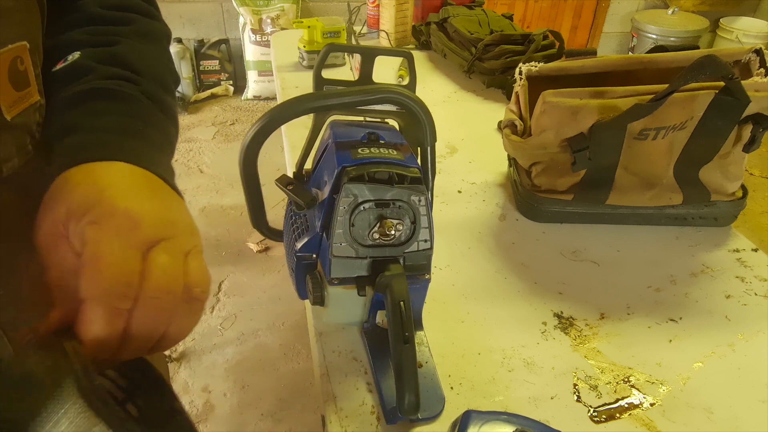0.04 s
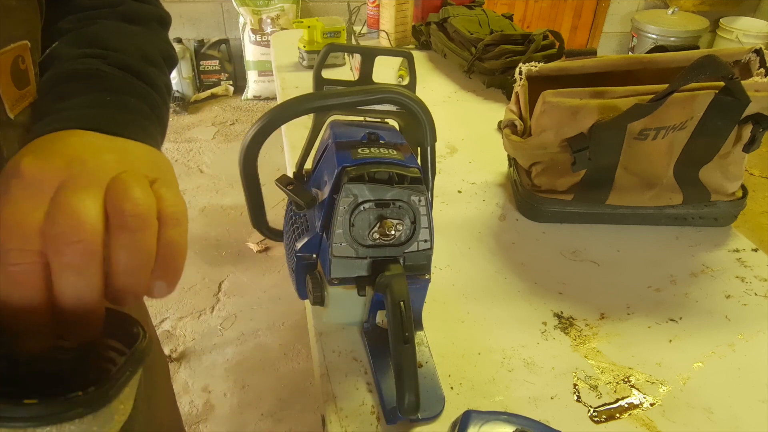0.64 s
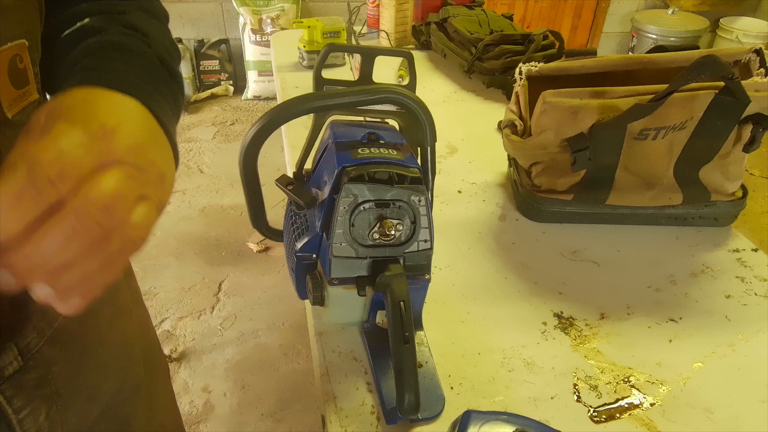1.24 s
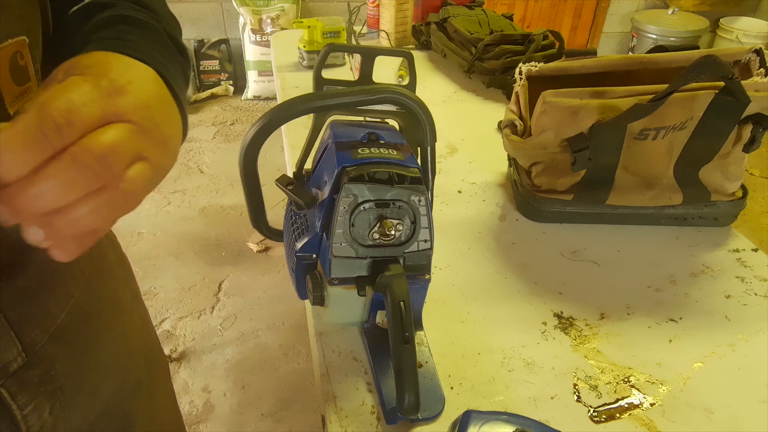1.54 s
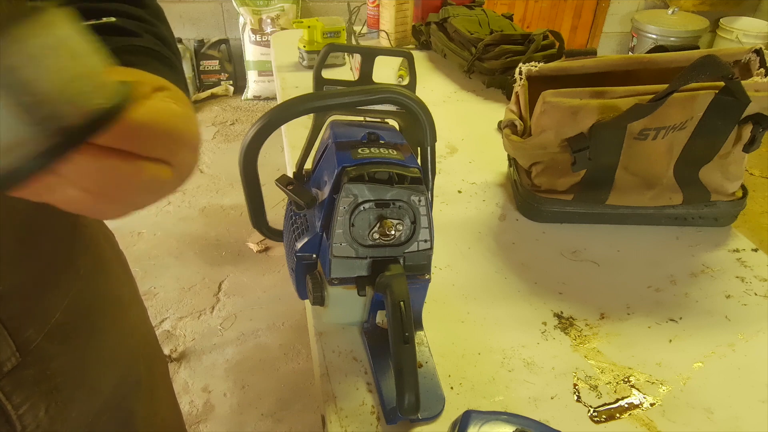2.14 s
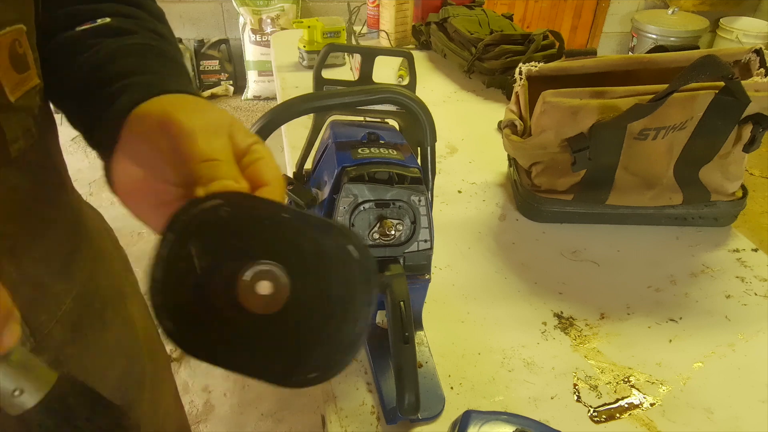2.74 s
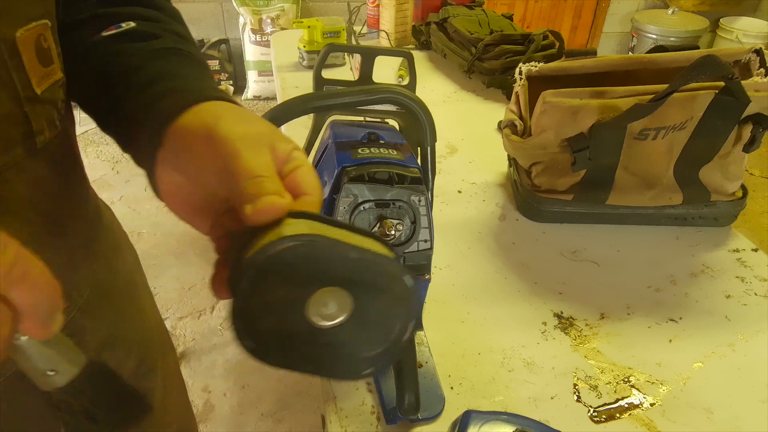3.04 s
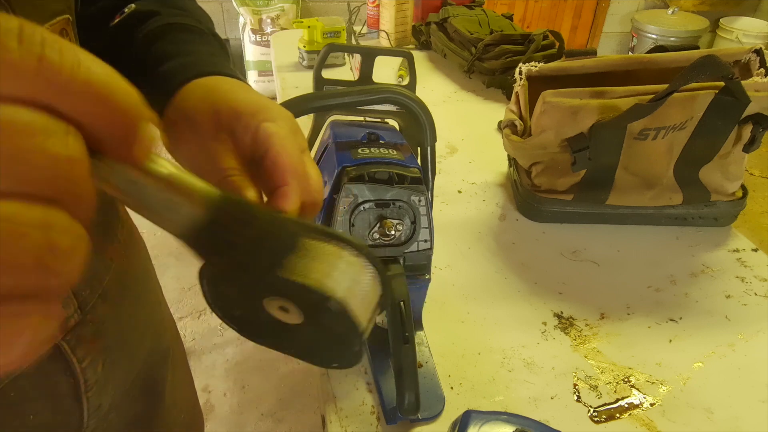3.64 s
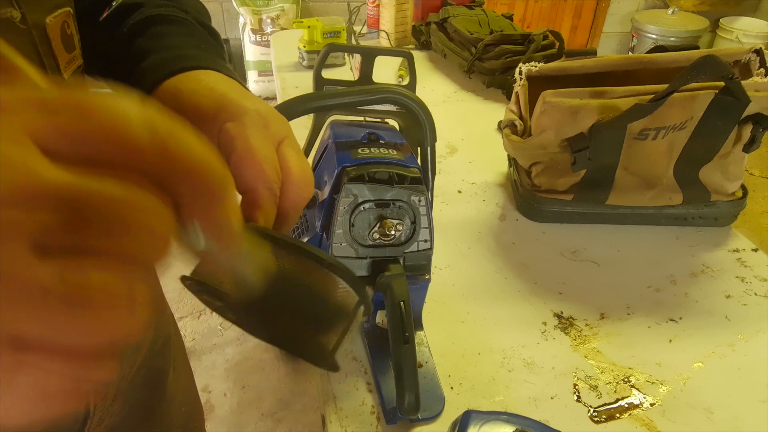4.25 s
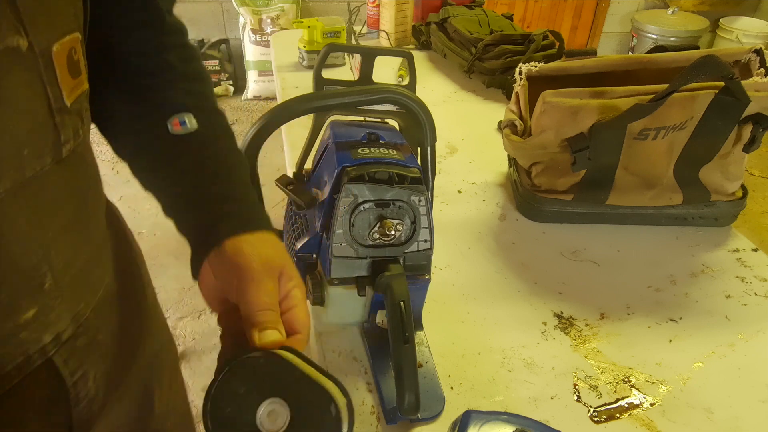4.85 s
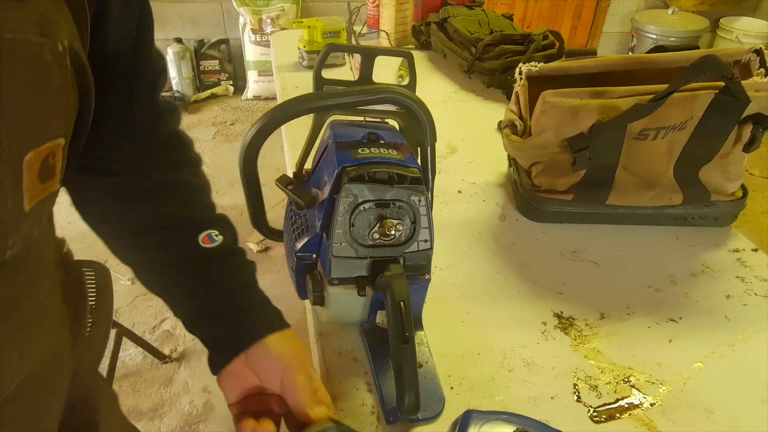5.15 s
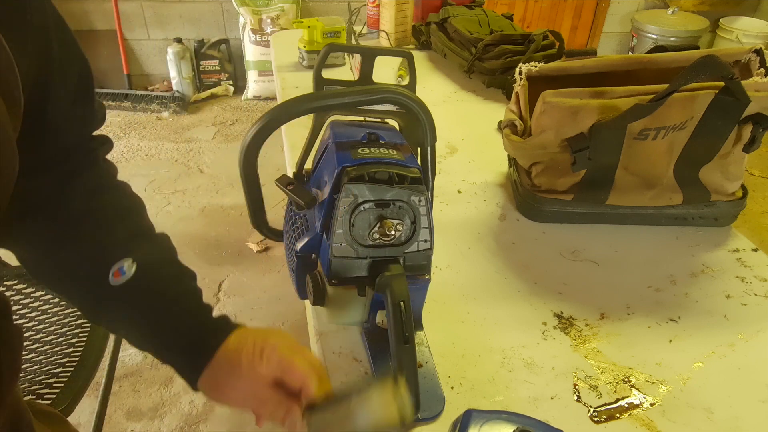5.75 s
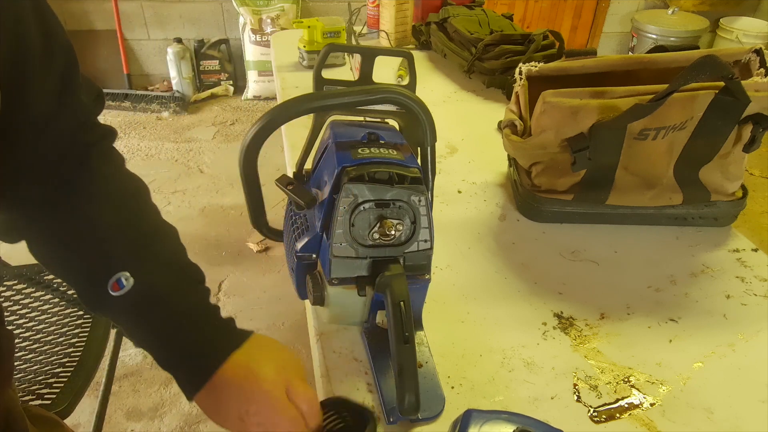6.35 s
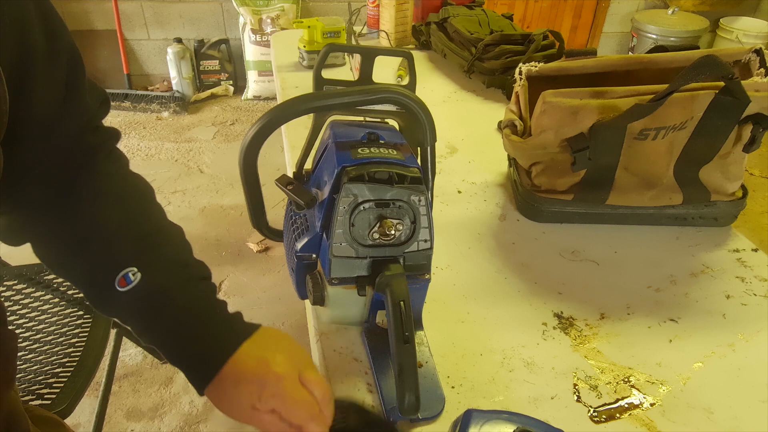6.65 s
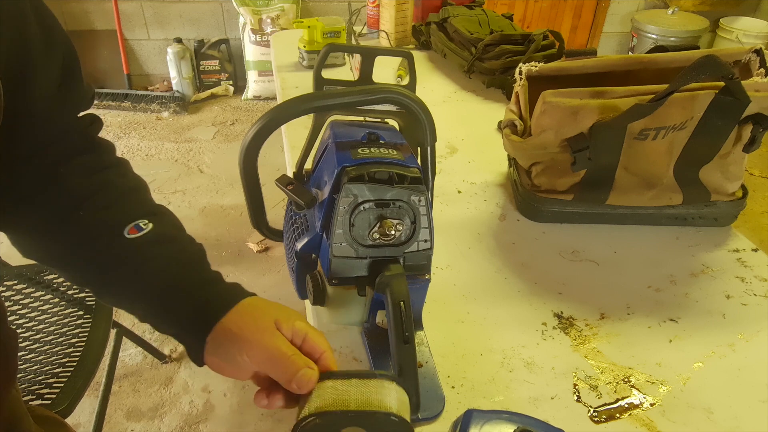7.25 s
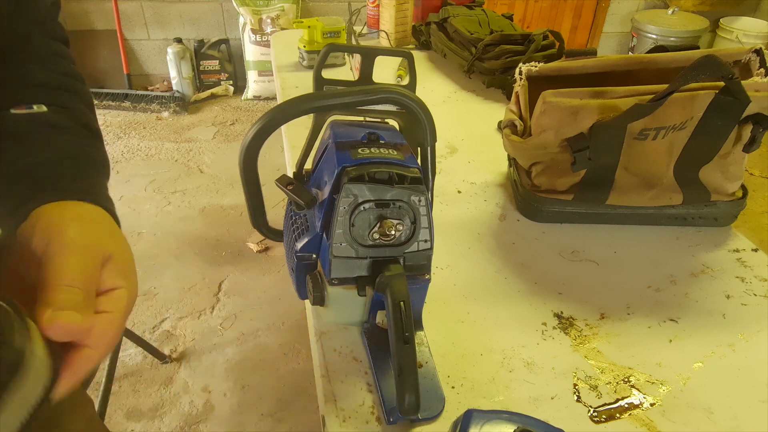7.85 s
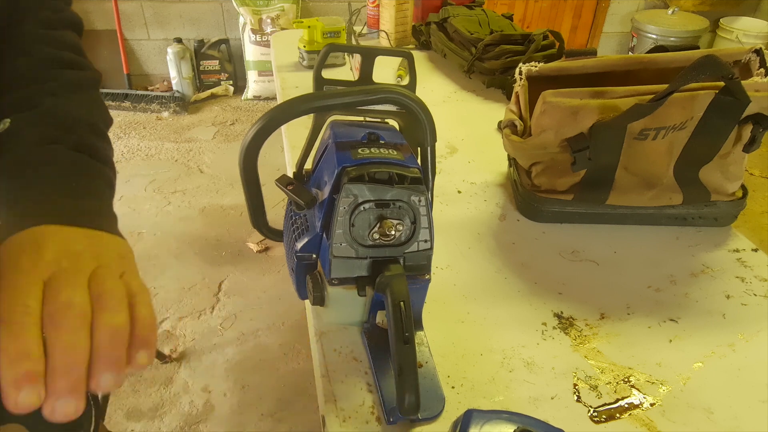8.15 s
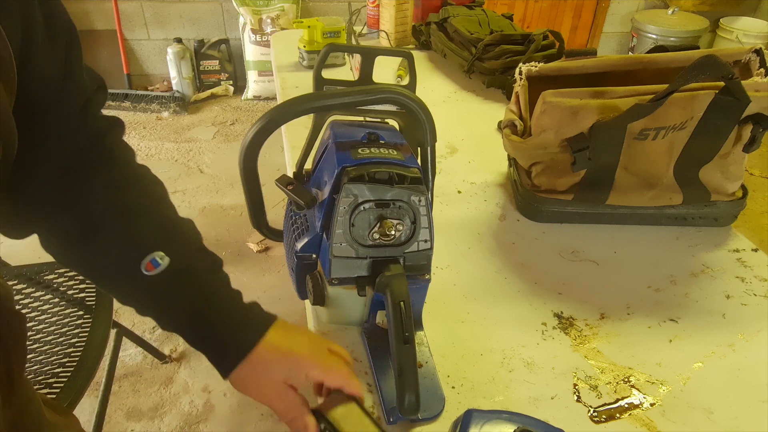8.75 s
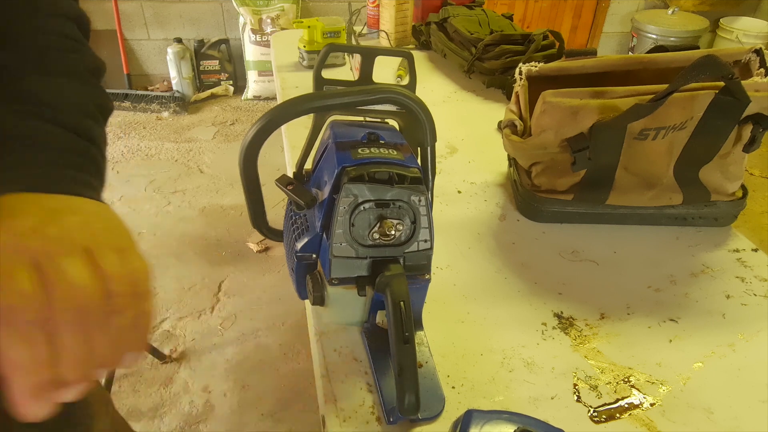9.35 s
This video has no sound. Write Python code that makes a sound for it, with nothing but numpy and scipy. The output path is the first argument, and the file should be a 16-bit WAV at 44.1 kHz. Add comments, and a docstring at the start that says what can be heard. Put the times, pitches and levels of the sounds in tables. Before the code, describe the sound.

In a workshop, a brush flicks softly over the pleats of a plastic air filter, close to the microphone, about three or four short hissing strokes a second, with a few small clicks. The filter is then knocked on a bench edge ten times in a quick run, each a loud hollow clack with a low thud. After a pause come two more knocks. A faint motor hum continues underneath.

```python
"""A chainsaw air filter is cleaned in a workshop, over the faint hum of a motor and still air.
First a brush flicks over the pleats, hissing by friction, and the frame snaps under the fingers.
From 5 s the filter is knocked ten times on the bench edge: each impact excites the modes of the plastic
frame and the bench top, the room reverberates, and a gain control briefly lowers the level.
A flick and a snap follow, then two more knocks near 8.7 s and a last faint flick."""
import sys
import numpy as np
from scipy import signal
from scipy.fft import rfft, irfft
from scipy.io import wavfile
from scipy.ndimage import minimum_filter1d

SR = 44100
rng = np.random.default_rng(int(sys.argv[2]) if len(sys.argv) > 2 else 0)


def inscribe(sig):
    """Save sig as 16-bit PCM at rate SR to the path in sys.argv[1].

    A 1-D sig is mono; a 2-D sig holds one channel per row.
    Samples are clipped to [-1, 1] before scaling.
    """
    pcm = np.round(np.clip(np.atleast_2d(sig).T, -1, 1) * 32767)
    wavfile.write(sys.argv[1], SR, pcm.astype(np.int16))


N = 414540
TIME = np.arange(N) / SR
TAIL = TIME[:int(.7 * SR)]   # time axis of one decay

# motor hum: (harmonic number, level [dB])
HUM_HARMONICS = [(1, -4), (2, -4.5), (3, -2), (4, -0.5), (5, 2.5), (6, -4.5), (7, -8.5), (8, -8.5), (9, -8),
                 (10, -32), (11, -6.5), (12, -8)]
# still air and microphone hiss: (frequency [Hz], spectral density [dB])
AIR_SPECTRUM = [(25, -3.5), (60, 4), (130, -2.5), (300, -1.5), (600, -3), (1000, -3), (2000, -5.5),
                (3400, -5.5), (4800, -11), (6100, -11.5), (7400, -27.5), (10000, -29.5), (16000, -31.5)]
# brush strokes: (mid time [s], level [dB], half length [s], first touch [share of the sweep])
BRUSH_FLICKS = [(0.04, -61.5, .014, 0), (0.204, -57, 0.021, 0.12), (0.369, -55.5, 0.018, 0.18),
                (1.266, -53, 0.012, .5), (1.546, -56.5, 0.013, 1.14), (1.833, -52.5, 0.016, 0.45),
                (2.11, -50, 0.014, 0), (2.384, -50.5, .019, 0.2), (2.66, -58, .03, 0),
                (2.97, -51.5, .012, 0.41), (3.254, -54, .014, 0.55), (3.511, -52, 0.013, 0.48),
                (3.742, -52, 0.019, 0.29), (3.946, -53.5, .016, .4), (4.14, -54.5, 0.022, 0),
                (4.366, -62.5, 0.051, 1.7), (7.533, -63, .028, 0), (9.373, -65, 0.021, 0)]
# bristle friction: (frequency [Hz], spectral density [dB])
BRISTLE_SPECTRUM = [(500, -18), (1500, -13), (3000, -6), (4300, -12), (5500, 1.5), (6400, 0), (7500, -11),
                    (8800, -22), (9600, -13.5), (12000, -23), (16000, -38)]
# workshop reverberation: (frequency [Hz], level [dB])
ROOM_SPECTRUM = [(50, 8.5), (100, 13), (200, 1), (400, -2.5), (800, 1), (1500, -4), (3200, -1),
                 (6000, -6.5), (12000, -1)]
# its decay: (frequency [Hz], T60 [s])
ROOM_DECAY = [(60, 1), (200, 0.37), (500, 0.5), (1100, 0.41), (3200, 0.38), (6000, 0.27), (12000, 0.23)]
# snaps of the frame: (time [s], level [dB], extra level of the lower modes [dB])
FINGER_SNAPS = [(.4020, -18, -20), (1.2205, -39, -14), (1.255, -34, 0.5), (1.2597, -38, -3),
                (1.5588, -45.5, 6), (4.117, -34, -9), (4.310, -43, -10), (7.7657, -36.5, -2)]
# small ringing edges of the frame: (frequency [Hz], level [dB], T60 [s])
EDGE_MODES = [(900, -11, .005), (1650, -5, 0.021), (2020, -9, .024), (2500, -8, 0.018),
              (4280, -6.5, 0.0044), (5330, -2.5, 0.013), (5540, -16, 0.0052)]
# blows: (time [s], force on the frame [dB], bench thud [dB], extra wall clack [dB],
# extra rim crack [dB], graze [share of the blow])
BLOWS = [(5.0588, -1, 0, -3.5, 3, 0.011), (5.2506, 2.5, 4, -1.5, -1.5, 0.029),
         (5.4250, -2.5, 2.5, -5.5, -7, 0.12), (5.8049, -8.5, -3, -2, -2, 0),
         (6.0008, 0.8, -2.5, -0.5, -1.5, 0.21), (6.193, 1.5, -1.5, -1, 0, 0.037),
         (6.374, 1, -1, -2.5, -2, .13), (6.538, 1.5, 1.5, 2.5, -.7, 0.23), (6.7251, 3, -1.5, 5.5, 4, 0.28),
         (6.9892, -1.4, -0.5, -3.5, -5, 0.12), (8.6734, -7, -2.5, 11.5, 2.5, 0.056),
         (8.8185, -6.5, -3.5, 8, 2.5, 0.16)]
# plastic frame: (frequency [Hz], bandwidth [Hz], level [dB])
FRAME_MODES = [(242.4, 62, 1.5), (351, 68, 4.5), (560, 136, 0), (811, 114, -0.5), (1025, 131, -1.5),
               (1282, 115, 0), (1475, 195, -5.5), (1906, 138, -4.5), (2037, 760, -11.5), (2940, 258, -6),
               (3261, 189, -4.5), (4120, 640, -13.5), (5110, 1070, -11.5), (5966, 1110, -12.5),
               (9460, 2400, -26.5)]
# where the hollow side walls ring most: (frequency [Hz])
WALL_RESONANCES = [1600, 3020]
# bench top: (frequency [Hz], level [dB], T60 [s])
BENCH_MODES = [(57.6, -34.5, 0.34), (75.5, -28, 0.36), (100.8, -23, 0.31), (120.8, -28.5, 0.31),
               (162.2, -25, 0.31), (187.6, -31, 0.53), (201.4, -22.5, 0.47), (229.9, -23, 0.37),
               (283.4, -28, 0.42), (366, -24.5, 0.42), (382, -35.5, 0.66), (443, -30, 0.43),
               (473, -32, 0.32), (544, -27, 0.28), (640, -32, 0.4), (787, -34, 0.27), (872, -34.5, 0.33),
               (1031, -37, 0.47), (1296, -39, 0.48), (1450, -28, 0.13)]


def from_db(db):
    """Amplitude ratio of a level in decibels."""
    return np.exp(np.asarray(db) * (np.log(10) / 20))


def rms_one(x):
    """Normalisation to unit rms."""
    return x / np.sqrt(np.mean(x ** 2) + 1e-20)


def at_hz(points, hz):
    """Interpolation on a log-frequency axis."""
    f, value = np.transpose(points)
    return np.interp(np.log(np.maximum(hz, 1)), np.log(f), value)


def add(track, s, sound):
    """Superposition of a sound starting at time s."""
    i = int(round(s * SR))
    track[i:i + len(sound)] += sound[:N - i]


def cut(x, hz, kind, order=2):
    """Maximally flat filtering."""
    sections = signal.butter(order, hz, kind, fs=SR, output="sos")
    return signal.sosfilt(sections, x + 1e-18)


def noise(spectrum):
    """Spectral shaping of white noise, at unit rms."""
    gain = from_db(at_hz(spectrum, np.arange(N // 2 + 1) * SR / N))
    return rms_one(irfft(rfft(rng.standard_normal(N)) * gain, N))


def drift(per_s):
    """Random modulation with a spread near 1."""
    knots = rng.standard_normal(N // 16)
    return np.interp(TIME * per_s, np.arange(len(knots)), knots)


def ring(x, hz, t60):
    """Damped oscillator: a unit impulse starts a decaying sine of height 1."""
    r, w = from_db(-60 / (t60 * SR)), 2 * np.pi * hz / SR
    return signal.lfilter([0, np.sin(w)], [1, -2 * r * np.cos(w), r * r], x + 1e-18)


def resonate(x, hz, width):
    """Forced resonance with unit peak gain."""
    r, w = np.exp(-np.pi * width / SR), 2 * np.pi * hz / SR
    return signal.lfilter(np.array([1, 0, -1]) * (1 - r * r) / 2, [1, -2 * r * np.cos(w), r * r], x + 1e-18)


def motor_and_air(hum_hz=68.96, hum_db=-60.5, air_db=-55, wander=0.00209, waver_db=1.5):
    """Periodic motion gives a harmonic series, wavering a little over broadband air noise."""
    phase = 2 * np.pi * np.cumsum(hum_hz * (1 + wander * drift(1.5))) / SR
    hum = 0
    for k, db in HUM_HARMONICS:
        hum += from_db(db + waver_db * drift(3)) * np.cos(k * phase + rng.uniform(0, 2 * np.pi))
    return from_db(hum_db) * hum + from_db(air_db) * noise(AIR_SPECTRUM)


def swell(middle_s, half_s):
    """Bell-shaped envelope of height 1."""
    return np.exp(-.5 * np.minimum(np.abs(TIME - middle_s) / half_s, 10) ** 2)


def brushing(level_db=2.5, grain_db=2.5, rasp_db=-5, touch_lead_s=0.05, touch_half_s=0.0083):
    """Friction noise follows bristle pressure: a touch, then a sweep. Firm strokes make the pleats rasp."""
    pressure = sum(from_db(db) * (touch * swell(s - touch_lead_s, touch_half_s) + swell(s, half_s))
                   for s, db, half_s, touch in BRUSH_FLICKS)
    pleats = rms_one(resonate(rng.standard_normal(N), hz=2900, width=1400))
    rasp = from_db(rasp_db) * pleats * pressure / pressure.max()
    grain = rms_one(from_db(grain_db * drift(per_s=900)))
    return from_db(level_db) * pressure * grain * (noise(BRISTLE_SPECTRUM) + rasp)


def room_echoes(count=1, build_s=0.0046):
    """Reverberation: dense reflections build up, then decay band by band; one row per source position."""
    edges_hz = np.geomspace(35, 17000, 19)
    white, echoes = rng.standard_normal((2, count, len(TAIL))), 0
    build = 1 - np.exp(-(TAIL / build_s) ** 2)
    for k, (low, high) in enumerate(zip(edges_hz, edges_hz[1:])):
        hz = np.sqrt(low * high)
        fade = from_db(-60 * TAIL / at_hz(ROOM_DECAY, hz)) * build
        band = cut(white[k % 2], [low, high], "band")
        echoes += band * from_db(at_hz(ROOM_SPECTRUM, hz)) * fade / np.linalg.norm(fade)
    return echoes


def snaps(dull_below_hz=3500, low_cut_hz=500, top_hz=6500):
    """Impulse response: each snap under the fingers sets the plastic edges ringing briefly."""
    ringing = np.zeros(N)
    for hz, mode_db, t60 in EDGE_MODES:
        clicks = np.zeros(N)
        for s, db, dull_db in FINGER_SNAPS:
            add(clicks, s, from_db([db + mode_db + dull_db * (hz < dull_below_hz)]))
        ringing += ring(clicks, hz, t60)
    return cut(cut(ringing, low_cut_hz, "high"), top_hz, "low", order=6)


def contact(chatter=0.51, chatter_t60=0.04, per_s=3500, soft_hz=7000):
    """Impact force: one hard impulse, then softer chatter of the frame against the bench."""
    touches = (rng.random(len(TAIL)) < per_s / SR) * rng.choice([-1, 1], len(TAIL))
    rebounds = chatter * cut(touches * from_db(-60 * TAIL / chatter_t60), soft_hz, "low", order=1)
    return (signal.unit_impulse(len(TAIL)) + rebounds)[:SR // 16]


def frame_clack(force, wall_db=0, rim_db=0, tuning=1, wall_octaves=0.31, rim_hz=4300, rim_per_octave=0.17):
    """Modal superposition: how the frame lands weights the modes of its side walls and its rim."""
    clack = 0
    for k, (hz, width, db) in enumerate(FRAME_MODES):
        mode = resonate(force, hz * tuning, width)
        mode = mode / np.linalg.norm(mode) * np.sqrt(np.pi * width / SR)   # energy follows bandwidth
        wall_share = np.exp(-(np.log2(hz / np.array(WALL_RESONANCES)) / wall_octaves) ** 2).max()
        octaves_up = np.log2(hz / rim_hz)
        rim_share = (.5 + .5 * np.tanh(10 * octaves_up)) * (1 + rim_per_octave * octaves_up)
        clack += (-1) ** k * mode * from_db(db + wall_db * wall_share + rim_db * rim_share)
    return clack


def bench_boom(swell_s=0.0048):
    """Free vibration: the bench top takes up the blow more slowly and its damped modes ring on."""
    phases = rng.uniform(0, 2 * np.pi, len(BENCH_MODES))
    modes = sum(from_db(db - 60 * TAIL / t60) * np.sin(2 * np.pi * hz * TAIL + phase)
                for (hz, db, t60), phase in zip(BENCH_MODES, phases))
    return modes * (1 - np.exp(-TAIL / swell_s))


def knocks(clack_db=32.0, boom_db=4.5, edge_hz=6900, leak_db=-13, shared_echo=0.58,
           diffuse_wall=0.45, grip_detune=0.027, graze_lead_s=.0025):
    """Impact excites frame and bench; each grip shifts the frame's tuning, each spot has its own echo."""
    clacks, booms = np.zeros(N), np.zeros(N)
    echoes = (room_echoes(count=len(BLOWS)) + shared_echo * room_echoes()) / np.hypot(1, shared_echo)
    tunings = np.exp(grip_detune * rng.standard_normal(len(BLOWS)))
    for (s, force_db, thud_db, wall_db, rim_db, graze), echo, tuning in zip(BLOWS, echoes, tunings):
        force = from_db(force_db)
        # landing askew, the rim grazes the bench just before the blow
        add(clacks, s - graze_lead_s, graze * force * frame_clack(contact()))
        add(clacks, s, force * frame_clack(contact(), wall_db, rim_db, tuning))
        # the diffuse field evens out the chatter and the directivity of the side walls
        diffuse = frame_clack(signal.unit_impulse(SR // 20), diffuse_wall * wall_db, rim_db, tuning)
        add(clacks, s, force * signal.oaconvolve(diffuse, echo))
        add(booms, s, from_db(thud_db) * bench_boom())
    # plastic radiates little above its highest strong resonance
    treble = from_db(leak_db) * cut(clacks, edge_hz, "high", order=8)
    clacks = cut(clacks, edge_hz, "low", order=8) + treble
    return from_db(clack_db) * clacks + from_db(boom_db) * booms


def scene(close_echo_db=-12):
    """The sources superpose; the hands are near the microphone, so their direct sound dominates."""
    hands = brushing() + snaps()
    reflections = from_db(close_echo_db) * signal.oaconvolve(hands, room_echoes()[0])[:N]
    return (hands + reflections + knocks() + motor_and_air())[None]


def record(dry, threshold_db=-14, depth_db=2.0, hold_s=0.38, smooth_hz=6, ceiling=0.83, cutoff_hz=16000):
    """Compression: loud peaks hold the gain down; saturation rounds them; a low-pass limits the band."""
    over_db = 20 * np.log10(np.abs(dry[0]) + 1e-9) - threshold_db
    span = 2 * int(hold_s * SR / 2) + 1
    gain_db = minimum_filter1d(-np.clip(over_db, 0, depth_db), span, origin=span // 2)
    held = dry * from_db(cut(gain_db, smooth_hz, "low", order=1))
    rounded = held / (1 + (held / ceiling) ** 4) ** .25
    return signal.sosfilt(signal.ellip(10, .1, 70, cutoff_hz, fs=SR, output="sos"), rounded)


dry = scene()
out = record(dry)
inscribe(out)
```